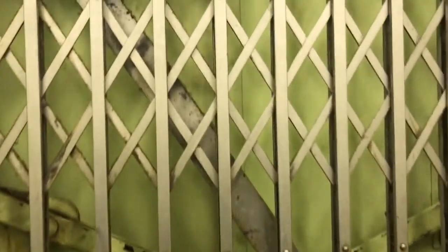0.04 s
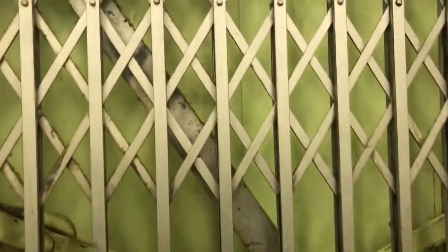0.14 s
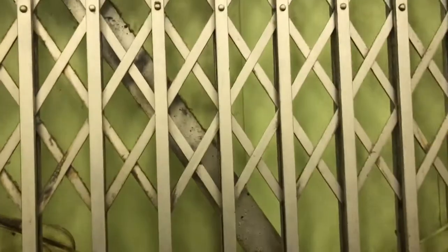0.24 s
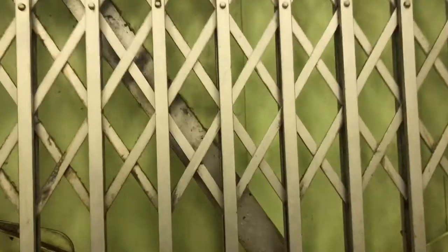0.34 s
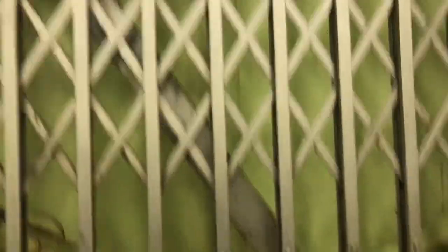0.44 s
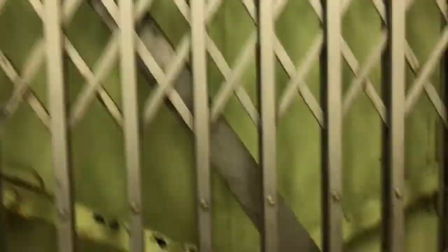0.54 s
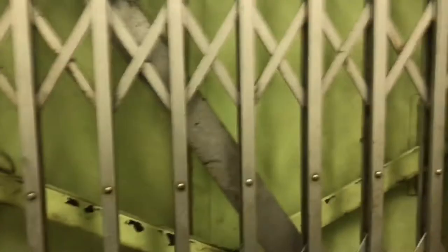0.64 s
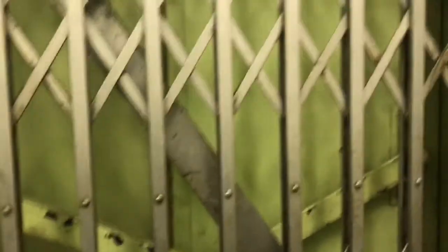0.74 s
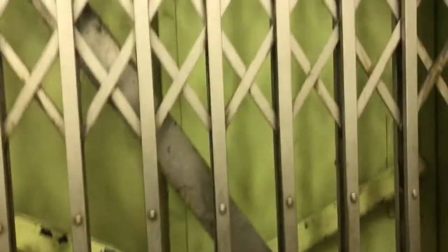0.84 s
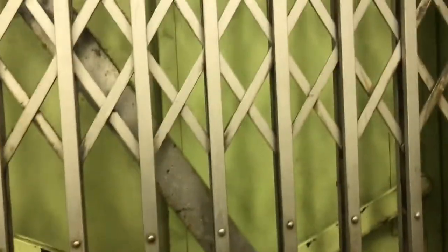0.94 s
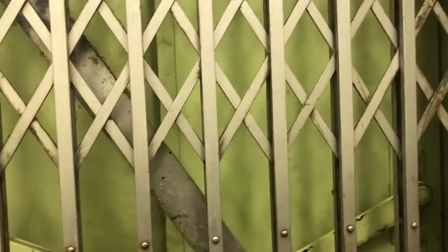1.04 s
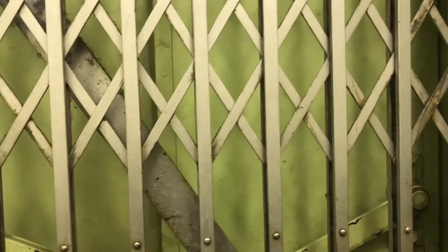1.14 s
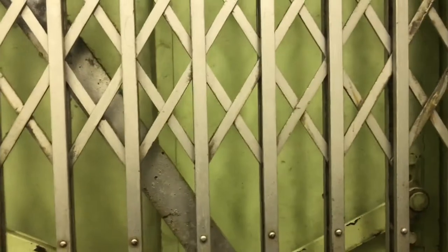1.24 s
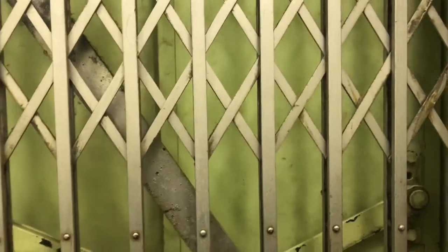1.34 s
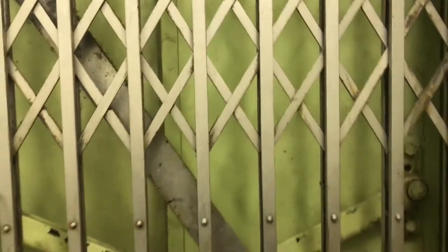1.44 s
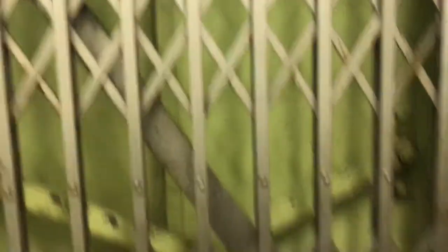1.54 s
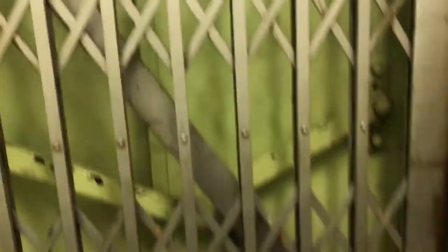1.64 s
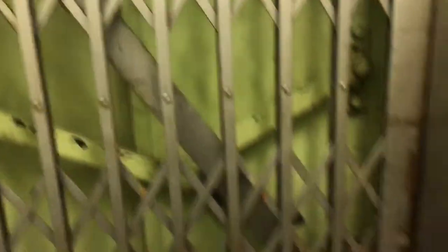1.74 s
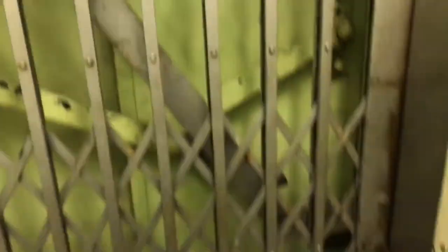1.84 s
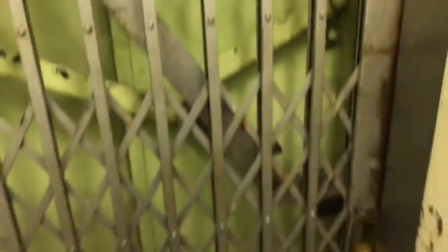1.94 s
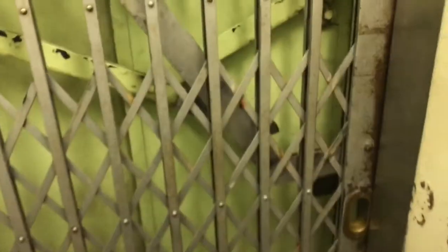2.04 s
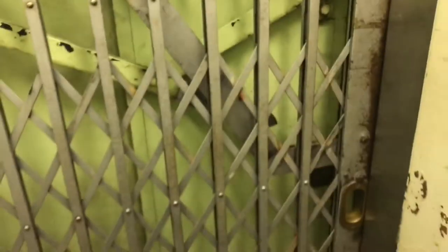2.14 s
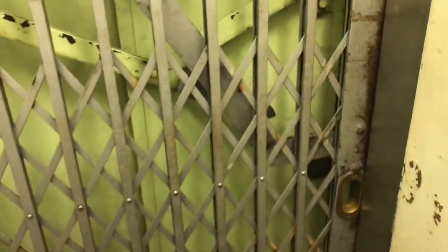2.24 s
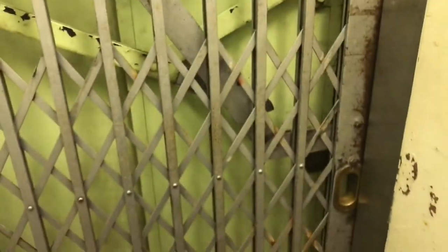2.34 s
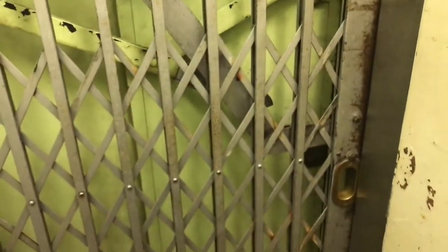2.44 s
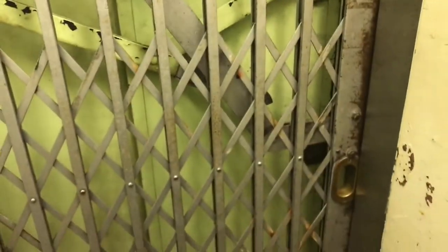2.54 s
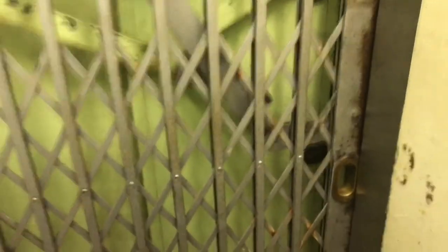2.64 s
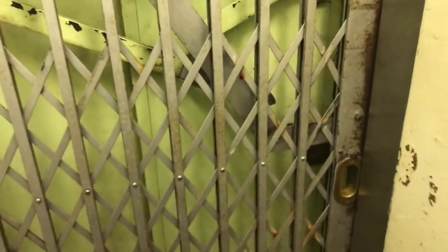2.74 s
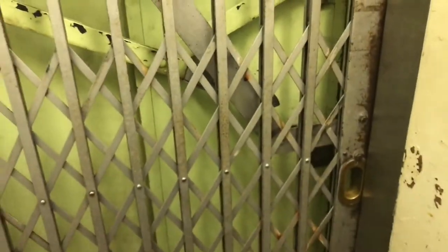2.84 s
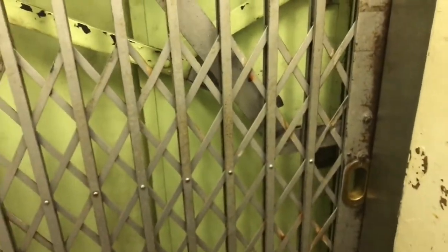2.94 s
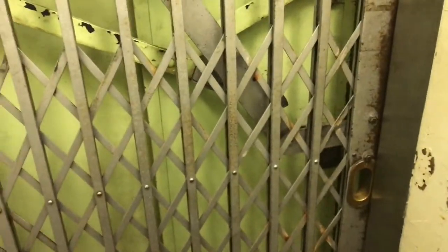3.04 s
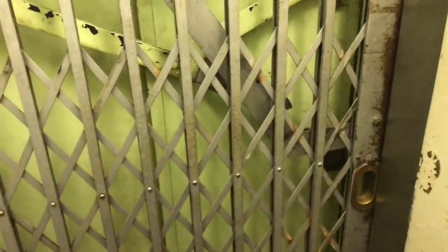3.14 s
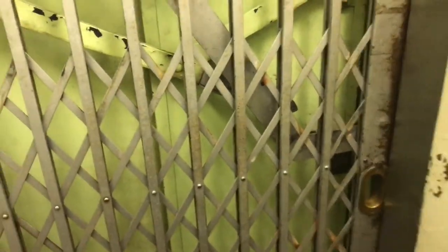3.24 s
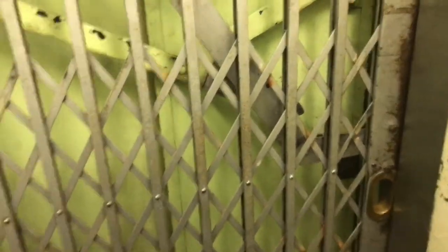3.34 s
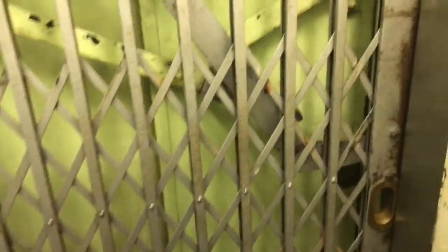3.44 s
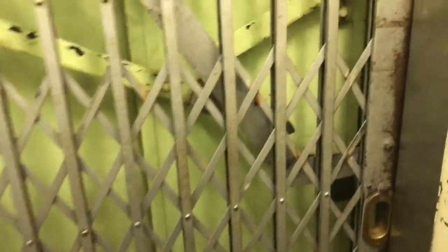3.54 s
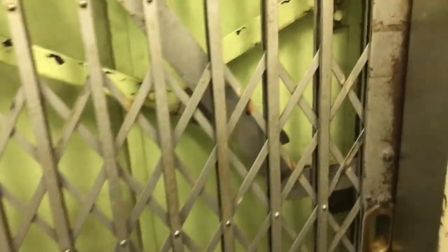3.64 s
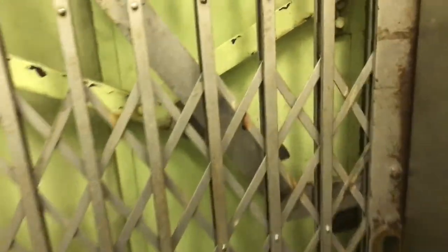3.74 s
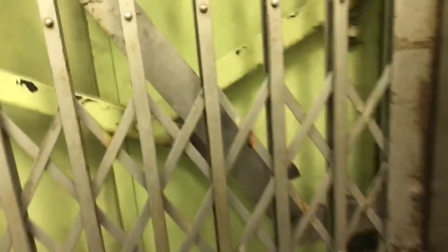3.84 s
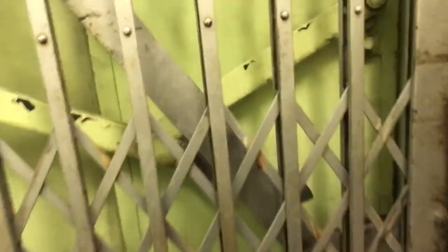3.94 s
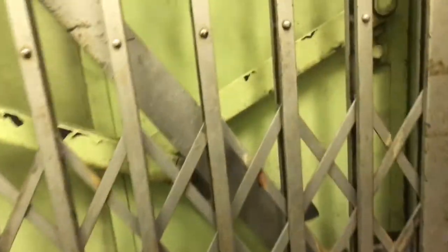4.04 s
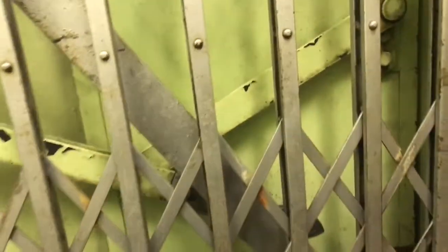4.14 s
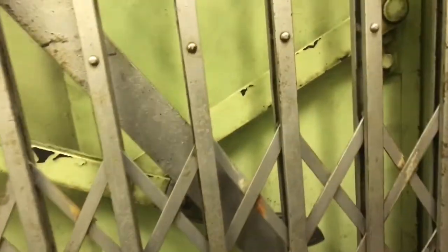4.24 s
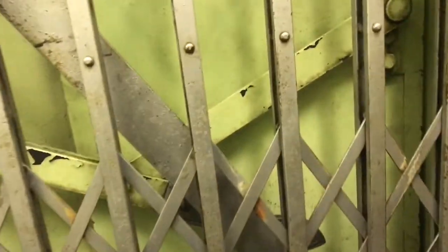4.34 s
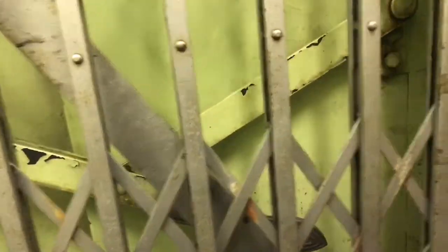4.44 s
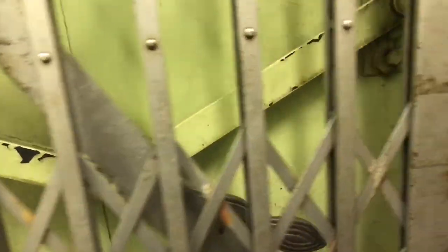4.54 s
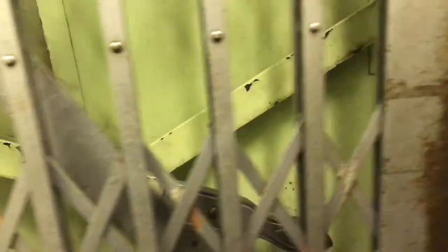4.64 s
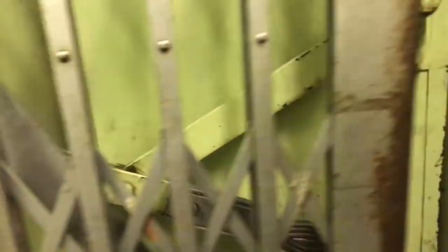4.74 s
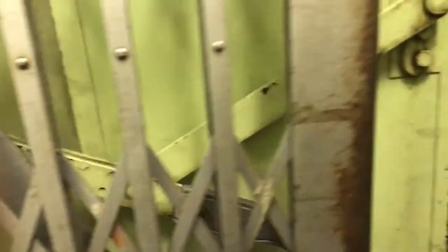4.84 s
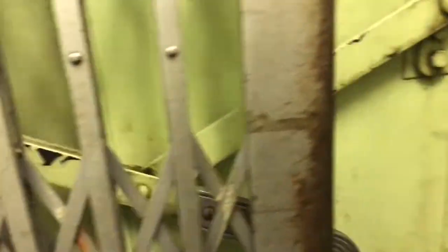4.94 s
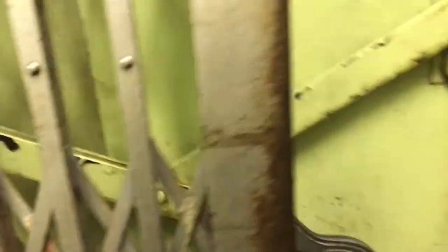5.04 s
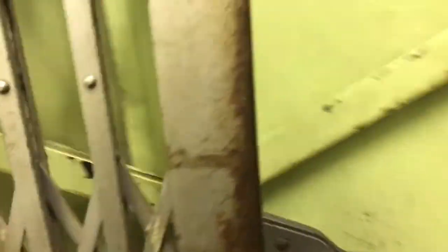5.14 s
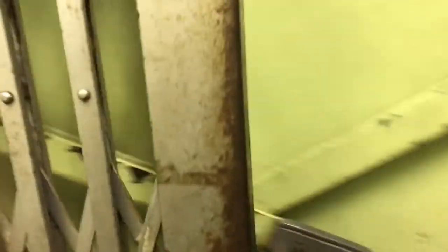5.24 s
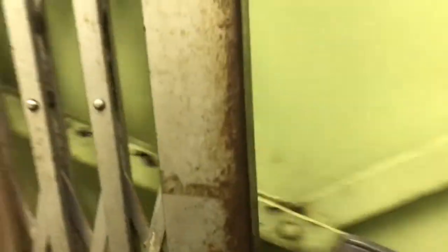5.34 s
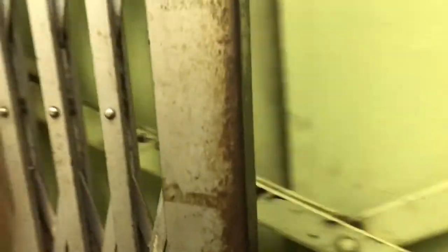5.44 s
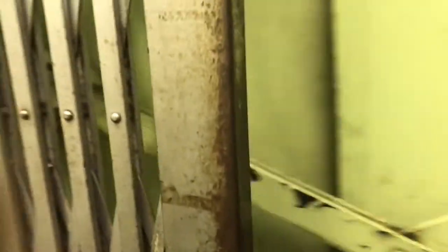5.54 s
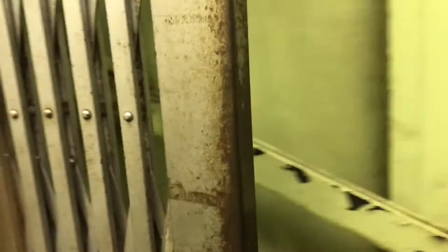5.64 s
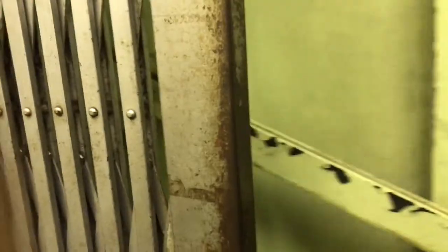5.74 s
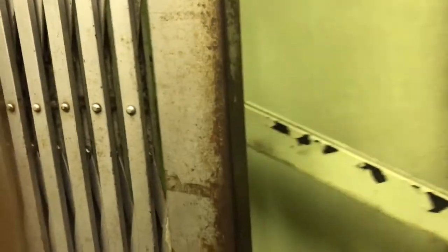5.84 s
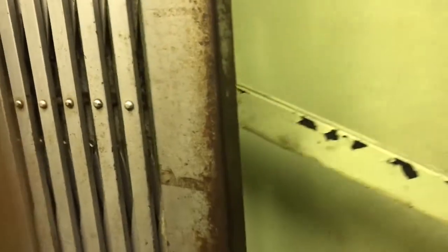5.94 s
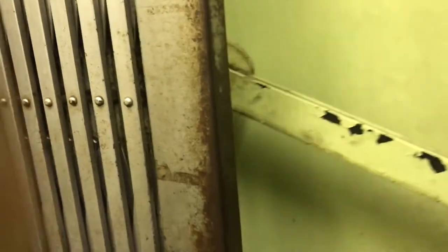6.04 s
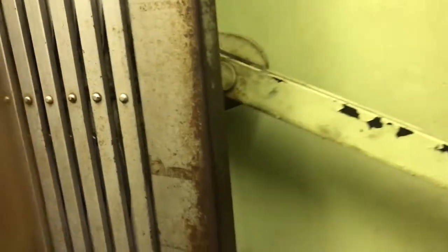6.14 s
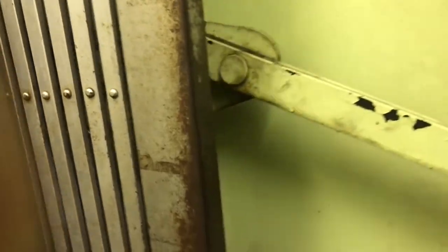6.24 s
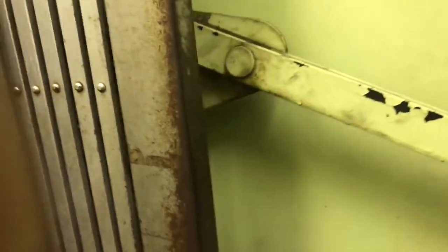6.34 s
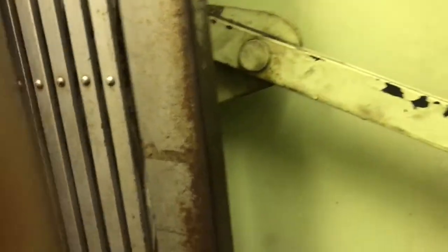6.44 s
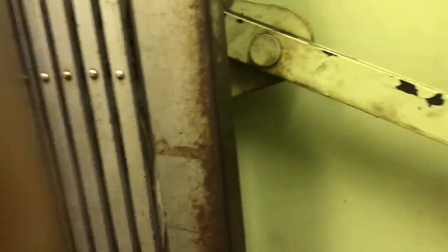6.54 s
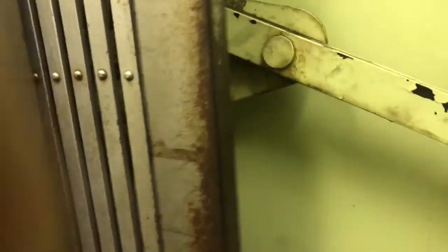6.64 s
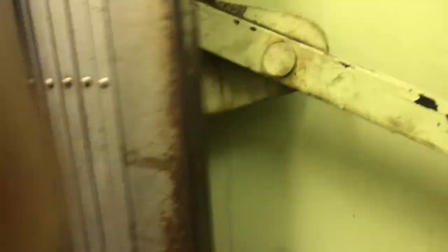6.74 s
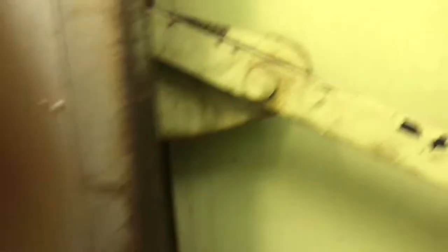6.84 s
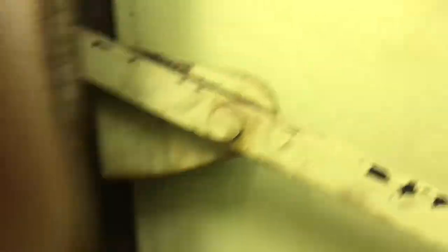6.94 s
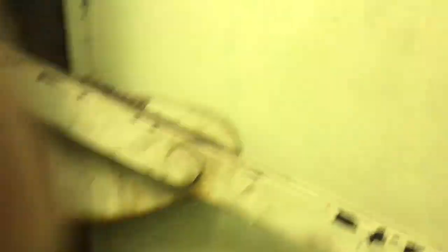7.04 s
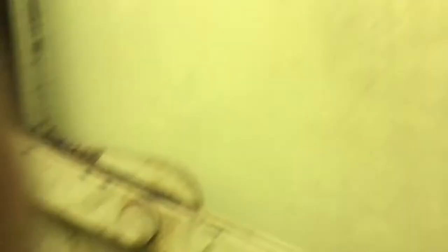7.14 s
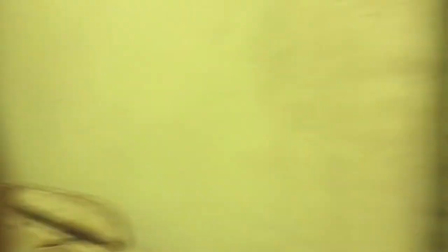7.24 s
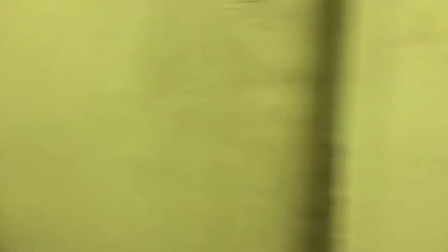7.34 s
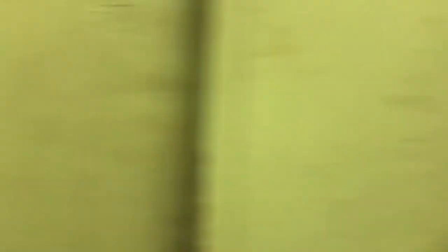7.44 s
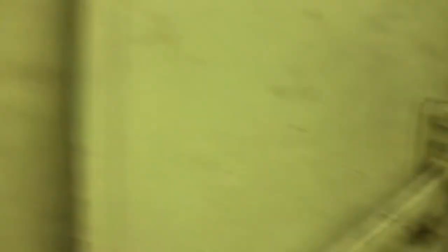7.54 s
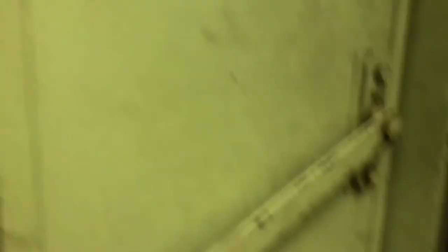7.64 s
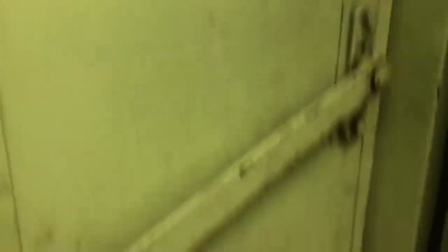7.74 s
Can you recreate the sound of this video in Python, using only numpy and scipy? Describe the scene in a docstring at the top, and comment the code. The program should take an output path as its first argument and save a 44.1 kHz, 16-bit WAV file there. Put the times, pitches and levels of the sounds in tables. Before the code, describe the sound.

Dull thud and distant gear clacks in a humming shaft, then a folding steel gate is dragged aside with rumble, scrape and two heavy slams.

```python
"""Over mains hum and low air noise, an old lift ticks, settles with a thud and clacks its gear; a faint whine
comes and goes in a soft hiss. A hand takes hold with soft thumps and pulls the scissor gate: rollers rumble and squeal,
bars rattle and scrape, a hinge chirps before the last of two loud clanks, and the car sways. Struck steel is shaped
noise plus decaying modes, rolling is resonant noise under a level curve, friction is a wavering harmonic tone."""
import sys
import numpy as np
from scipy import signal
from scipy.fft import rfft, irfft, next_fast_len
from scipy.io import wavfile

SR = 44100
rng = np.random.default_rng(int(sys.argv[2]) if len(sys.argv) > 2 else 0)


def dump_mix(stems):
    """Bounce the given channels to the path in sys.argv[1] as a 16-bit WAV at rate SR."""
    frames = np.atleast_2d(stems).T  # one column per channel
    limited = np.clip(frames, -1, 1)  # hard clip at full scale
    pcm = np.round(limited * 32767).astype(np.int16)
    wavfile.write(sys.argv[1], SR, pcm)


N = 343539
TIME = np.arange(N) / SR
BAND_EDGES = 25 * 2 ** np.arange(0, 9.7, 1 / 3)  # third octaves [Hz]
BAND_HZ = np.sqrt(BAND_EDGES[1:] * BAND_EDGES[:-1])

# knocks of the gate, with two soft handling thumps first, before the bars' colour:
# (time [s], level [dB], bass [dB], treble [dB], rattle length [s], pitch that rings most [Hz])
GATE_KNOCKS = [(3.638, -55, 22, -5, 0.0096, 148), (3.76, -45, 13, -26, 0.02, 1090),
               (4.325, -46.5, -5, -5, 0.023, 1530), (4.461, -31, -29, 7.5, .019, 4400),
               (4.490, -35.5, -17, 6, 0.035, 4300), (4.575, -30, -19, 3.5, .02, 1490),
               (4.630, -25.5, 1, -1, .02, 4500), (4.649, -21.5, 7, -13.5, .012, 1200),
               (4.730, -26.5, -3, -12, 0.0049, 1380), (5.044, -26.5, -13, -10.5, .015, 1590),
               (5.160, -34.5, -3, -2, 0.0087, 1650), (5.405, -34.5, -18, -8, 0.014, 1670),
               (5.549, -32, -20, 10, 0.031, 6500), (5.670, -26, -9, -32, 0.034, 1090),
               (5.863, -37.5, -4, 2.5, 0.0019, 6550), (5.946, -27.5, 7, 3.5, 0.017, 935),
               (6.087, -51, 29.5, -5, .011, 110), (6.178, -29.5, -36, -10, 0.0028, 1710),
               (6.232, -34.5, -19, -6, 0.0021, 1810), (6.373, -38, -10, 1, 0.023, 1610),
               (6.457, -20.5, -14, -5.5, .008, 1720), (6.510, -32.5, -16, 9, 0.0075, 1800),
               (6.591, -25.5, -23, -1.5, .02, 1650), (6.705, -32, -13, 3, .02, 984),
               (6.7335, -23.5, -23, 14.5, 0.0021, 5060), (6.758, -10, -14.5, 5, .008, 714),
               (6.769, -12, -9, 1.5, 0.0077, 1630), (7.127, -37, -4, 10.5, 0.035, 4000),
               (7.160, -16, -2, 6.5, 0.019, 990), (7.177, -10.5, 0, 2.5, .02, 328),
               (7.215, -22, -15, 8, 0.035, 2640)]
# a struck steel part with its many joints: (frequency [Hz], density [dB per Hz])
STEEL_COLOUR = [(35, -2), (100, 0), (160, 2), (230, -0.5), (330, -5), (470, -5), (620, -7.5), (950, -2),
                (1200, -4), (1600, -5), (2600, -10.5), (5000, -10.5), (9000, -19.5), (16000, -24.5)]
# the bars' strongest modes: (frequency [Hz], relative level [dB], t60 [s])
BAR_MODES = [(322.5, -0.5, 0.31), (629, -2.5, 0.16), (884, -13, 0.15), (951.5, -1.5, 0.3), (1430, -8, 0.19),
             (1586, 0, 0.28), (1730, -1, 0.13), (1850, -15, 0.22), (2183, -3, 0.12), (2920, -7.5, 0.23),
             (3300, -18, 0.2), (4290, -2, 0.1), (5340, -10, 0.17), (6440, -19, .18), (8280, -7, 0.16)]
# echo in the shaft: (frequency [Hz], t60 [s])
SHAFT_T60 = [(60, 3.9), (150, 2.2), (400, 1.08), (1000, 0.54), (2800, 0.54), (7000, 0.37), (15000, 0.39)]

# level of the rolling noise: (time [s], level [dB])
ROLLING_LEVEL = [(4.42, -50), (4.71, -21), (4.83, -33), (4.95, -24.5), (5.4, -26.5), (5.41, -28),
                 (5.85, -28), (5.86, -45.5), (5.97, -20), (6.07, -35), (6.1, -29.5), (6.16, -36.5),
                 (6.29, -33.5), (6.7, -38.5), (7.24, -25), (7.39, -34.5), (7.7, -32), (7.79, -39)]
REFERENCE_DB = -26
# each sliding sound: level at the reference [dB], and dB gained for each dB of rolling level
RUMBLE_DB, RUMBLE_FOLLOWS = -26.5, 1.02
RATTLE_DB, RATTLE_FOLLOWS = -41.5, 0.69
SCRAPE_DB, SCRAPE_FOLLOWS = -47.5, 0.33
PULL_S, PULL_LENGTH_S = 4.4, 2.85  # the hand keeps the lattice under load
# frame and car shaken by the rollers: (frequency [Hz], width [Hz], relative level [dB])
FRAME_RESONANCES = [(64, 21, -3), (108.4, 35.5, 0), (151.8, 33, 1.5)]
# the track's own drone: (frequency [Hz], width [Hz], relative level [dB])
TRACK_RESONANCES = [(262, 78, -4), (385, 31.5, 1), (344, 480, -3.5)]
# the rollers run freely and the track drones: (time [s], length [s], level [dB])
FREE_RUNS = [(4.635, 1.18, -36.5), (6.958, 0.28, -38)]
# the joints bind and grind: (time [s], length [s], scrape level [dB])
JOINT_BINDS = [(4.424, 0.15, -44), (4.632, 0.31, -45), (5.545, 0.14, -43.5), (6.426, 0.35, -40)]

# a dry roller squeals in spurts: (time [s], length [s], starting pitch [Hz], level of a 0 dB harmonic [dB])
ROLLER_SQUEALS = [(4.475, .03, 5620, -36), (4.517, 0.035, 5685, -19), (4.582, 0.036, 5660, -24.5),
                  (4.63, .04, 5780, -33), (4.67, 0.071, 5895, -25), (4.762, 0.034, 5875, -36),
                  (4.82, 0.048, 5884, -29.5), (4.925, 0.03, 5900, -39.5), (5.06, .03, 5885, -37)]
# a second roller groans lower: (time [s], length [s], starting pitch [Hz], level of a 0 dB harmonic [dB])
ROLLER_GROANS = [(4.478, 0.031, 2186, -33), (4.805, 0.098, 2233, -38)]
# a hinge before the last slam: (time [s], length [s], starting pitch [Hz], level of a 0 dB harmonic [dB])
HINGE_CHIRPS = [(7.088, 0.022, 1200, -41), (7.128, 0.027, 1335, -33)]

# the car settles with a dull thud: (frequency [Hz], density [dB per Hz])
THUD_COLOUR = [(30, -13), (82, 5), (186, -3.5), (224, -0.5), (340, -7.5), (520, -11.5), (640, -7.5),
               (760, -24), (1630, -23), (2400, -36), (8000, -56), (16000, -75)]
# the lift's gear clacks further off in the shaft, before the gear's colour:
# (time [s], level [dB], bass [dB], treble [dB], rattle length [s], pitch that rings most [Hz])
GEAR_CLACKS = [(0.810, -29.5, -1, -6, 0.0069, 885), (0.930, -33.5, -0.5, -5.5, 0.0055, 3300),
               (0.955, -37.5, 2.5, -4, 0.028, 2400), (1.04, -39, -1, -9, 0.043, 960),
               (1.289, -36.5, -23, -14.5, 0.0033, 976), (1.332, -44, 2, 3.5, 0.003, 2900),
               (1.565, -47.5, 0, -13, 0.0051, 1030)]
# the gear's modes: (frequency [Hz], relative level [dB], t60 [s])
GEAR_MODES = [(564, -1, 0.55), (918, 1, 0.14), (1060, 1, 0.33), (1795, -2, .3), (2430, -1, 0.19),
              (2880, 2, 0.21), (3380, 0, 0.27)]
# dry ticks by band, the last two rows forming one click:
# (time [s], level before the band-pass [dB], lowest [Hz], highest [Hz], decay [s])
TICK_BANDS = [(0.2774, -30, 398, 9800, 0.00086), (0.438, -32, 5500, 12900, 0.00045),
              (0.570, -46, 8000, 15000, .001), (1.722, -24, 444, 870, 0.0035),
              (2.684, -23, 9200, 15500, 0.00043), (2.6832, -18, 200, 5800, 0.00075)]

# soft treble hiss: (time [s], level before HISS_GAIN_DB [dB])
HISS_LEVEL = [(1.15, -64), (1.97, -67.5), (2.5, -75), (3.09, -75.5), (3.46, -61), (3.61, -58),
              (4.03, -64.5), (4.3, -66)]
HISS_GAIN_DB = 5
# spectrum of the hiss: (frequency [Hz], density [dB per Hz])
HISS_COLOUR = [(350, -12), (600, -7), (1070, -5), (2040, -10), (5950, -15), (10500, -21.5), (15000, -21.5),
               (16000, -39)]
# a faint whine comes and goes: (time [s], length [s], starting pitch [Hz], level [dB])
WHINES = [(1.55, 0.38, 1288, -67.5), (2.45, 0.37, 1285, -66.5)]
# mains hum: (frequency [Hz], mean level [dB])
MAINS_HUM = [(100.3, -48.5), (200.5, -64.5), (300.9, -61), (401, -74)]
# low rush of the shaft: (frequency [Hz], relative density [dB])
AIR_COLOUR = [(15, -58), (25, -53), (43, 6.5), (102, -11), (153, -7.5), (170, -21.5), (206, -17.5),
              (263, -18), (301, -17), (326, -19.5), (405, -25), (1230, -32), (1330, -32), (1480, -29.5),
              (16000, -78)]
AIR_DB = -48.5


def gate_knocks(bars):
    """Impact excitation: the gate's bars ring in their modes, softly for the first thumps, loudly for the slams."""
    return knocks(GATE_KNOCKS, bars, bounce=0.54, ring_db=5.5)


def knocks(blows, parts, bounce, ring_db, ring_octaves=0.24, bass_hz=480, treble_hz=3200):
    """Multiple impact: slack joints split a blow into contacts; each blow has its own bass and treble."""
    out = np.zeros(N)
    bass = 1 / (1 + (BAND_HZ / bass_hz) ** 8)
    treble = 1 / (1 + (treble_hz / BAND_HZ) ** 3)
    for k, (s, db, bass_db, treble_db, rattle_s, ring_hz) in enumerate(blows):
        ringing = np.exp(-(np.log2(BAND_HZ / ring_hz) / ring_octaves) ** 2)
        gains = from_db(db + bass_db * bass + treble_db * treble + ring_db * ringing)
        delays = np.append(0, rng.random(size=4)) * abs(rattle_s)
        forces = np.append(1, bounce * rng.uniform(0.81, 1.41, size=4))
        forces /= np.linalg.norm(forces)
        # two parts strike each other
        pair = gains @ parts[k % len(parts)], gains @ parts[(k + 1) % len(parts)]
        for j, (delay, force) in enumerate(zip(delays, forces)):
            add(out, s + delay, force * pair[j % 2])
    return out


def steel_response(modes, body_t60, shaft_db, crack_db, modes_db, crack_s=0.0021, scatter_db=2):
    """Impulse response of a steel part by bands: a crack, dense ringing, clear modes and the shaft's echo."""
    t = TIME[:SR]
    bands = noise_bands(STEEL_COLOUR, t)
    echo = from_db(shaft_db - 60 * t / at_hz(SHAFT_T60, BAND_HZ)[:, None])
    body = from_db(-60 * t / body_t60)
    crack = from_db(crack_db) * np.exp(-t / crack_s)
    bands *= np.hypot(body + crack, echo)
    for (hz, db, t60), (strength, sign) in zip(modes, rng.standard_normal((len(modes), 2))):
        decay = from_db(modes_db + db + scatter_db * strength - 60 * t / t60)
        nearest = np.argmin(abs(np.log(BAND_HZ / hz)))
        bands[nearest] += np.sign(sign) * 2 * decay * np.sin(2 * np.pi * hz * t)
    return bands


def sliding(bars, bind_rattle_db=-3):
    """Rolling excitation of frame and joints follows a level curve; the track drones, binding joints rattle and scrape."""
    rolling_db = in_time(ROLLING_LEVEL) - REFERENCE_DB
    binding = sum(from_db(db) * swell(s, length_s, attack_s=0.027, release_t60=0.37)
                  for s, length_s, db in JOINT_BINDS)
    drone = sum(from_db(db) * swell(s, length_s, attack_s=0.084, release_t60=0.67)
                for s, length_s, db in FREE_RUNS)
    rumble = swell(PULL_S, PULL_LENGTH_S, attack_s=0.26, release_t60=6)
    rumble *= from_db(RUMBLE_DB + RUMBLE_FOLLOWS * rolling_db)
    rattle = swell(PULL_S, PULL_LENGTH_S, attack_s=0.037, release_t60=3.5)
    rattle *= from_db(RATTLE_DB + RATTLE_FOLLOWS * rolling_db)
    scrape = swell(PULL_S, PULL_LENGTH_S, attack_s=0.12, release_t60=2.7)
    scrape *= from_db(SCRAPE_DB + SCRAPE_FOLLOWS * rolling_db)
    # independent noises add in power
    rattle = np.hypot(rattle, from_db(bind_rattle_db) * binding)
    scrape = np.hypot(scrape, binding)
    rattling = chatter(bars, per_s=150, spread_db=0.5, low_hz=530, high_hz=2487, ping_db=-1, ping_t60=0.11)
    scraping = chatter(bars, per_s=150, spread_db=5.5, low_hz=3300, high_hz=14800, ping_db=-12, ping_t60=0.05)
    return (rumble * resonant(FRAME_RESONANCES) + drone * resonant(TRACK_RESONANCES)
            + rattle * rattling + scrape * scraping)


def chatter(bars, per_s, spread_db, low_hz, high_hz, ping_db, ping_t60):
    """Random contacts from the start of the pull: each taps a bar and pings a joint at its own pitch; rms 1."""
    t, out = TIME[:SR // 4], np.zeros(N)
    taps = [rms_one(band(bar.sum(axis=0)[:len(t)], low_hz, high_hz)) for bar in bars]
    ping = from_db(ping_db) * rms_one(from_db(-60 * t / ping_t60))
    contacts = rng.random((int(per_s * (TIME[-1] - PULL_S)), 3))
    for k, (when, size, pitch) in enumerate(contacts):
        hz = low_hz * (high_hz / low_hz) ** pitch
        force = from_db(spread_db * min(-np.log(1 - size), 3))
        contact = taps[k % len(taps)] + ping * np.sin(2 * np.pi * hz * t)
        add(out, PULL_S + (k + when) / per_s, force * contact)
    return out / np.std(out[TIME > PULL_S])


def roller_squeals():
    """Stick-slip friction: one dry roller squeals high and a second groans lower."""
    high = squeal(ROLLER_SQUEALS, [0, -32], attack_s=0.0087, release_t60=0.084, rise_hz_per_s=110,
                  waver=0.0027, flutter_db=3.0, wet=0.72)
    low = squeal(ROLLER_GROANS, [-5, 1.5, -5.5, -15.5, -16], attack_s=0.022, release_t60=0.21,
                 rise_hz_per_s=640, waver=0.0105, flutter_db=2.5, wet=0.71)
    return high + low


def hinge():
    """Stick-slip friction with strong pitch waver makes a faint, rough chirp."""
    return squeal(HINGE_CHIRPS, [-12, 0, -4], attack_s=0.012, release_t60=0.05, rise_hz_per_s=900,
                  waver=0.018, flutter_db=4, wet=0.7)


def squeal(spurts, harmonics_db, attack_s, release_t60, rise_hz_per_s, waver, flutter_db, wet, echo_t60=0.34):
    """A harmonic tone whose pitch creeps up in each spurt, wavering and fluttering, smeared by a short echo."""
    wobble = 1 + waver * (drift(60) + drift(500))
    partials = [from_db(db + flutter_db * drift(70)) for db in harmonics_db]
    tone = np.zeros(N)
    for s, length_s, hz, db in spurts:
        now = (TIME > s) & (TIME < s + length_s + release_t60)
        pitch_hz = (hz + rise_hz_per_s * (TIME[now] - s)) * wobble[now]
        phase = 2 * np.pi * np.cumsum(pitch_hz) / SR
        wave = sum(gain[now] * np.sin((k + 1) * phase) for k, gain in enumerate(partials))
        envelope = swell(s, length_s, attack_s, release_t60, TIME[now])
        tone[now] += np.sqrt(2) * from_db(db) * envelope * wave
    echo = rng.standard_normal(SR // 2) * from_db(-60 * TIME[:SR // 2] / echo_t60)
    smeared = signal.oaconvolve(tone, echo / np.linalg.norm(echo))[:N]
    return (tone + wet * smeared) / np.hypot(1, wet)


def sway():
    """Low resonances of the swaying car, sounding from the last slam and dying away."""
    envelope = swell(7.17, length_s=0.14, attack_s=0.069, release_t60=3.4)
    return from_db(-29.5) * envelope * resonant([(40.0, 17, 0), (67, 26, 0.5)])


def thud(rise_s=0.025, hold_s=0.054, body_t60=0.7, shaft_db=-8, linger=1.39):
    """Damped vibration and reverberation: the car takes the jolt; noise swells, dies and lingers in the shaft."""
    t = TIME[:SR * 2]
    late = np.maximum(t - hold_s, 0)
    echo_t60 = linger * at_hz(SHAFT_T60, BAND_HZ)[:, None]
    echo = from_db(shaft_db - 60 * late / echo_t60)
    envelope = np.minimum(t / rise_s, 1) * np.hypot(from_db(-60 * late / body_t60), echo)
    out = np.zeros(N)
    add(out, 0.624, from_db(-23.5) * (noise_bands(THUD_COLOUR, t) * envelope).sum(axis=0))
    return out


def gear_clacks():
    """Impact excitation: the gear rings in its own modes with a strong shaft echo."""
    gear = [steel_response(GEAR_MODES, body_t60=0.21, shaft_db=-3.5, crack_db=3.5, modes_db=-18.0)
            for _ in range(3)]
    return knocks(GEAR_CLACKS, gear, bounce=0.48, ring_db=4)


def ticks(tail_db=-32, tail_s=0.028):
    """Transients: band-limited noise snaps, fast-decaying with a faint tail."""
    t, out = TIME[:SR // 5], np.zeros(N)
    for s, db, low_hz, high_hz, decay_s in TICK_BANDS:
        envelope = np.exp(-t / decay_s) + from_db(tail_db) * np.exp(-t / tail_s)
        snap = rng.standard_normal(len(t)) * envelope
        add(out, s, from_db(db) * band(snap, low_hz, high_hz))
    return out


def soft_hiss():
    """Broadband noise of fixed spectrum under a slowly changing level."""
    return from_db(in_time(HISS_LEVEL) + HISS_GAIN_DB) * coloured(HISS_COLOUR)


def building(waver_db=1):
    """Steady tones and noise: mains hum and a faint whine over the low rush of the shaft."""
    hum = sum(from_db(db + waver_db * drift(5.4)) * np.sin(2 * np.pi * (hz * TIME + rng.random()))
              for hz, db in MAINS_HUM)
    whine = squeal(WHINES, [0], attack_s=0.059, release_t60=2.1, rise_hz_per_s=44,
                   waver=0.0025, flutter_db=1.0, wet=0.2)
    return np.sqrt(2) * hum + whine + from_db(AIR_DB) * coloured(AIR_COLOUR)


def from_db(db):
    """Level law: decibels to amplitude gain."""
    return np.exp(np.asarray(db) * np.log(10) / 20)


def rms_one(x):
    """Normalise power: scale to rms 1."""
    return x / np.sqrt(np.mean(x ** 2) + 1e-20)


def in_time(rows):
    """Linear interpolation of a curve at every sample."""
    return np.interp(TIME, *np.transpose(rows))


def at_hz(points, hz):
    """Linear interpolation of a spectrum on a log-frequency axis."""
    points = np.array(points)
    return np.interp(np.log(hz), np.log(points[:, 0]), points[:, 1])


def add(out, s, sound):
    """Superposition: mix a sound in at a time."""
    i = int(s * SR)
    out[i:i + len(sound)] += sound[:max(N - i, 0)]


def band(x, low_hz, high_hz):
    """Band limitation by a Butterworth band-pass."""
    edges = [low_hz, min(high_hz, SR * 9 / 20)]
    return signal.sosfilt(signal.butter(2, edges, "band", fs=SR, output="sos"), x)


def swell(start_s, length_s, attack_s, release_t60, t=TIME):
    """An envelope with linear rise, hold until its length is up, and exponential decay."""
    age = t - start_s
    return np.clip(age / attack_s, 0, 1) * from_db(-60 * np.clip((age - length_s) / release_t60, 0, 2))


def drift(rate):
    """Random modulation: chance values joined by lines, `rate` knots a second, rms 1."""
    knots = rng.standard_normal(int(N / SR * rate) + 2)
    return rms_one(np.interp(TIME * rate, np.arange(len(knots)), knots))


def coloured(spectrum):
    """Spectral shaping of white noise to a given spectrum, rms 1."""
    size = next_fast_len(N)
    hz = np.fft.rfftfreq(size, 1 / SR) + 1  # avoids log 0
    shaped = rfft(rng.standard_normal(size)) * from_db(at_hz(spectrum, hz))
    return rms_one(irfft(shaped, size)[:N])


def resonant(modes):
    """Resonance: noise ringing in a few bands, rms 1."""
    return rms_one(sum(
        from_db(db) * rms_one(band(rng.standard_normal(N), max(hz - width / 2, 15), hz + width / 2))
        for hz, width, db in modes))


def noise_bands(spectrum, t):
    """Spectral decomposition: third-octave bands of noise whose sum has rms 1."""
    white = rng.standard_normal((2, len(t)))  # neighbouring bands are independent
    bands = np.array([band(white[k % 2], BAND_EDGES[k], BAND_EDGES[k + 1]) * from_db(at_hz(spectrum, hz))
                      for k, hz in enumerate(BAND_HZ)])
    return bands / np.std(bands.sum(axis=0))


def scene():
    """Superposition of the gate, the swaying car, the lift's gear and the building."""
    bars = [steel_response(BAR_MODES, body_t60=0.15, shaft_db=-11.5, crack_db=1.5, modes_db=-19.0)
            for _ in range(4)]
    gate = gate_knocks(bars) + sliding(bars) + roller_squeals() + hinge()
    lift = sway() + thud() + gear_clacks()
    return (gate + lift + ticks() + soft_hiss() + building())[None]


def record(dry):
    """Band limits and saturation: the microphone sheds deep rumble, peaks are rounded, the top is cut."""
    high_pass = signal.butter(4, 28, "high", fs=SR, output="sos")
    heard = signal.sosfilt(high_pass, dry)
    low_pass = signal.ellip(10, 0.1, 90, 15900, fs=SR, output="sos")
    return signal.sosfilt(low_pass, 1.198 * np.tanh(heard / 1.2))


dry = scene()
out = record(dry)
dump_mix(out)
```